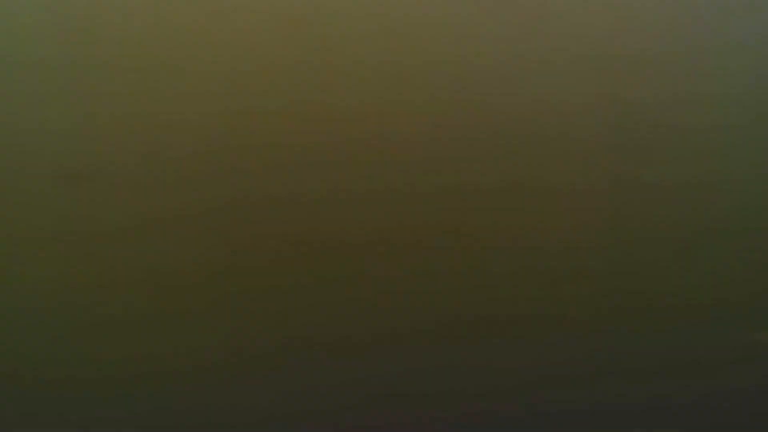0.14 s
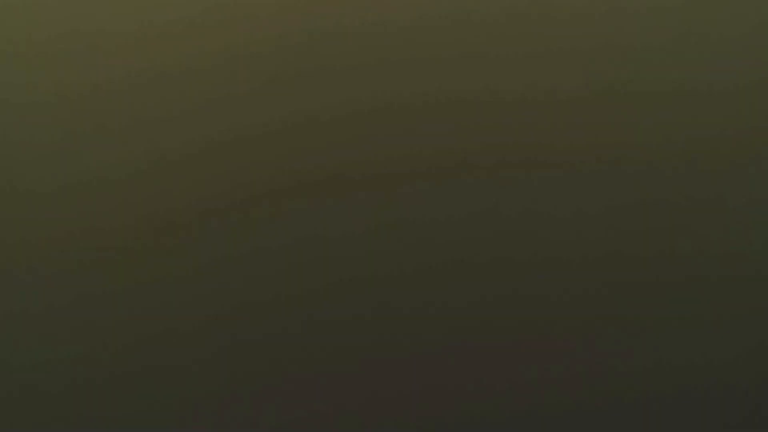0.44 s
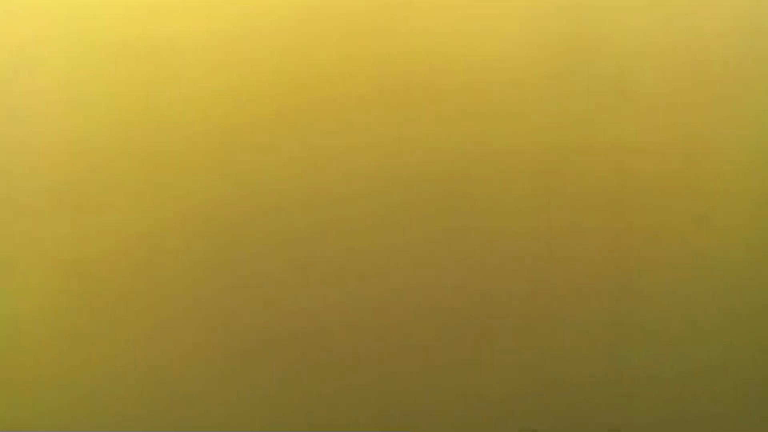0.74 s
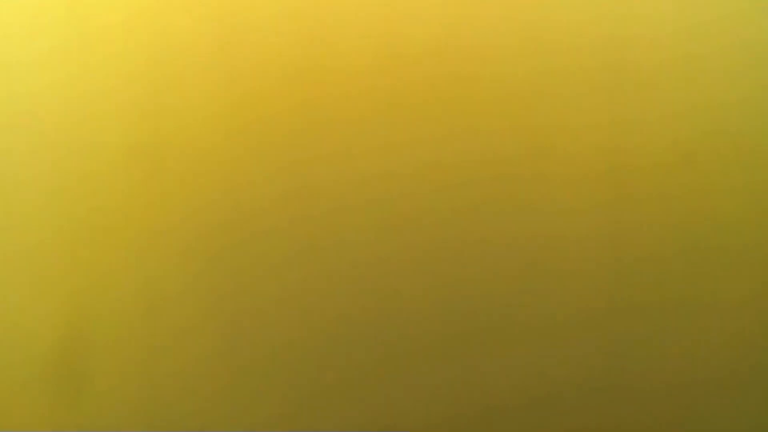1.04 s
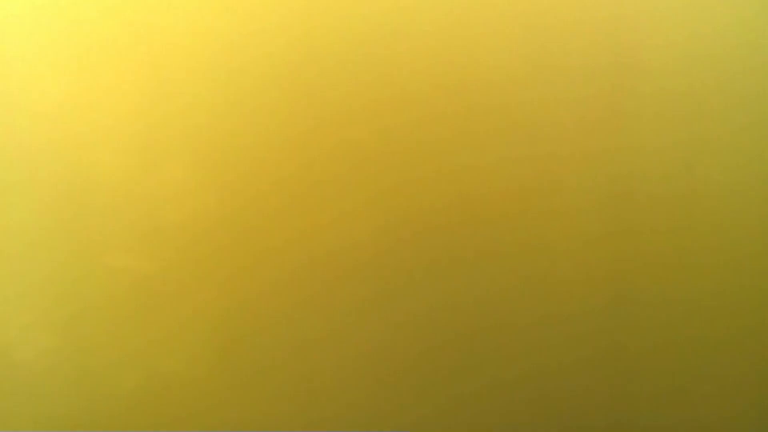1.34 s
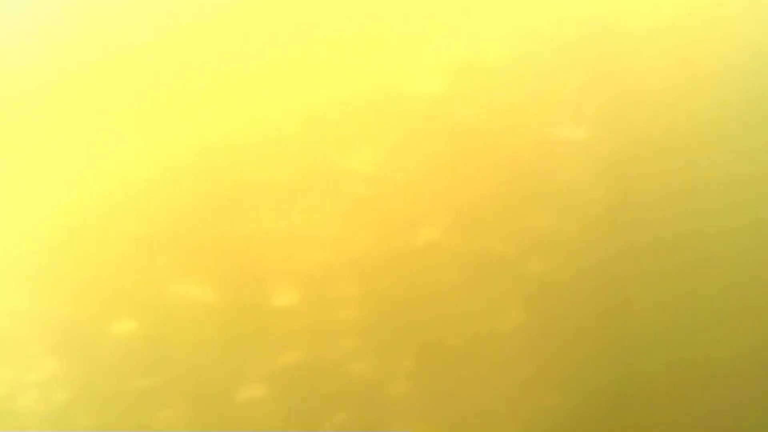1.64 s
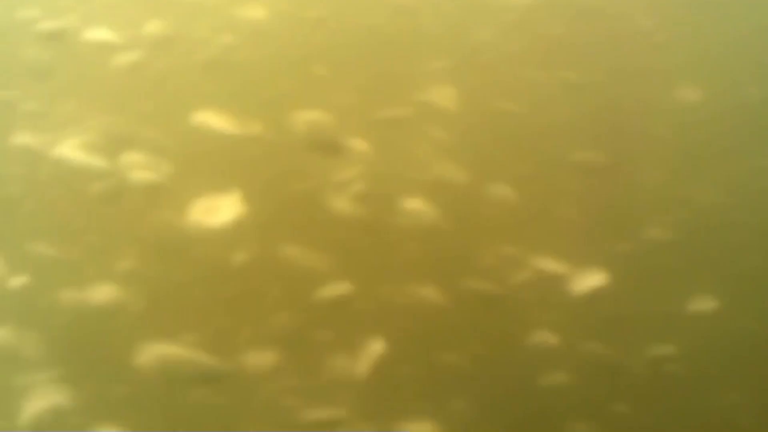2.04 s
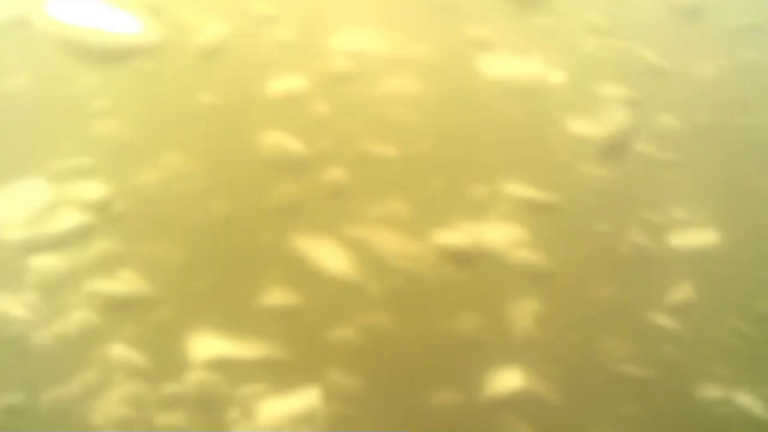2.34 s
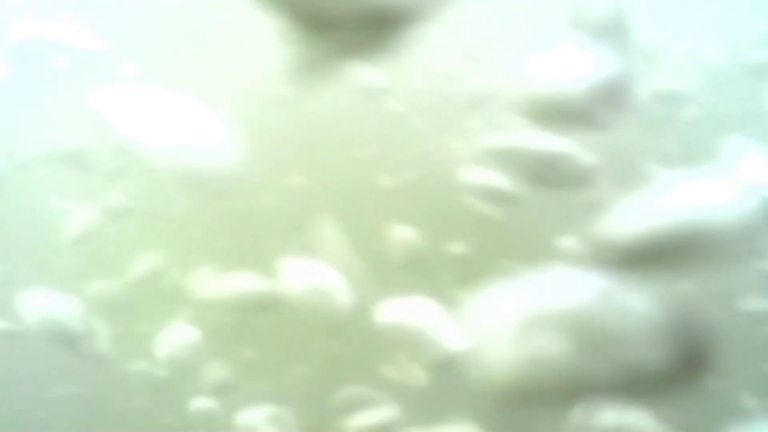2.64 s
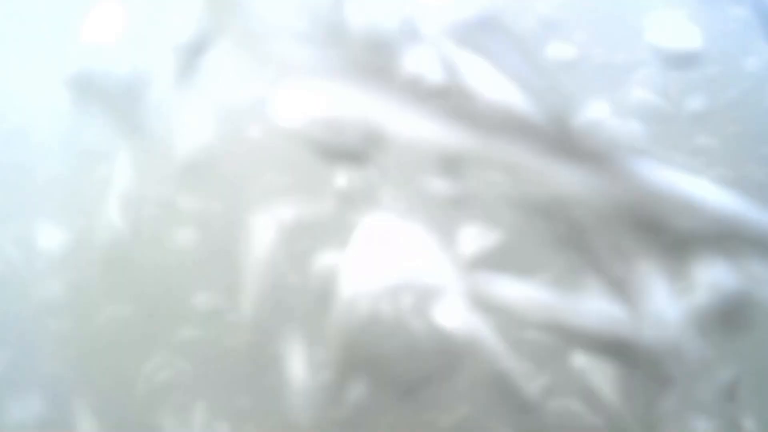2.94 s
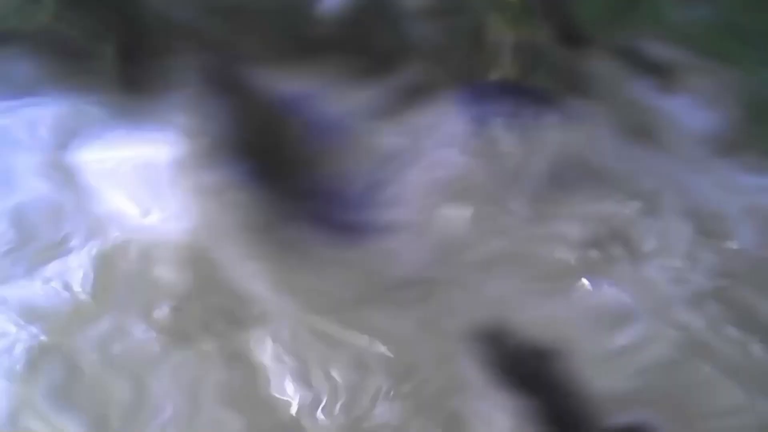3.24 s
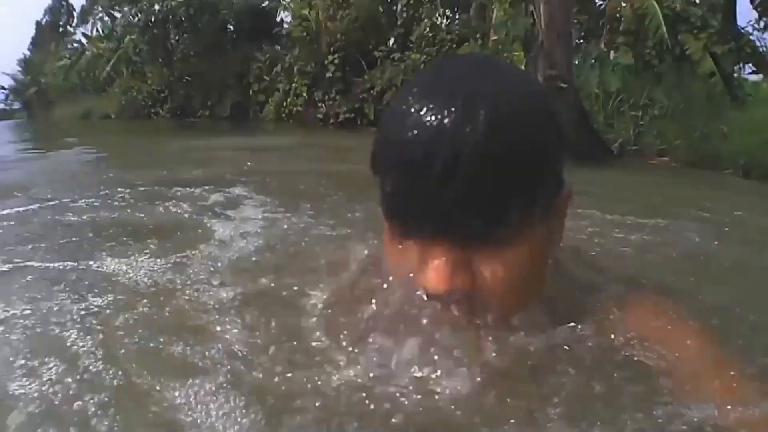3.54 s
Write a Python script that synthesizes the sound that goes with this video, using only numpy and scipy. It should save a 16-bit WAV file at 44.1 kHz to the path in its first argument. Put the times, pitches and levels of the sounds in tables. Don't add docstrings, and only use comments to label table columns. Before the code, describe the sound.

Water churns against a sealed camera beside a swimmer in an outdoor pond; an overloaded splash comes first, then quieter deep gurgling, then bright dripping, slapping spray as it surfaces, through a narrow, boxy microphone.

```python
import sys
import numpy as np
from scipy import signal
from scipy.io import wavfile

SR = 44100
rng = np.random.default_rng(int(sys.argv[2]) if len(sys.argv) > 2 else 0)


def waveform_to_disk(signal):
    frames = np.transpose(np.atleast_2d(signal))
    scaled = np.clip(frames, -1, 1) * 32767
    samples = np.round(scaled).astype(np.int16)
    wavfile.write(sys.argv[1], SR, samples)


N = 163170

# t/s, vigour level/dB, small-bubble muffling/dB, large-bubble weight/dB
CHURN_PATH = [(0, -40, -4, 15.5), (0.082, -48, 8.5, 3), (0.097, -14, 12.5, 13.5), (0.191, -35.5, 17.5, 2.5),
              (0.292, -10.5, -7.5, -16), (0.359, -5, -9.5, 4), (0.492, -5.5, -13, -16),
              (0.519, -12, -9.5, -8.5), (.64, -14, -19, -4), (0.951, -22.5, -26, 2.5),
              (1.8, -25.5, -28.5, 0.5), (2.6, -30, -27, -2.5), (2.88, -20.5, -33, -7),
              (3.081, -24, -23.5, -15.5), (3.3, -21, -21, -26), (3.482, -20.5, -11.5, -22),
              (3.6, -25.5, -10.5, -14), (3.65, -41, -6.5, -2)]
# f/Hz, level/dB
BUBBLE_SIZES = [
    (35, -31.5),
    (110, 1),
    (750, -0.5),
    (1080, -4),
    (1500, 7.5),
    (2150, 1.5),
    (2500, -11.5),
    (6000, -19),
]
# t/s, peak level/dB, f/Hz, t60/s
GLUGS = [(.405, 4.5, 252, 0.13), (.55, 0, 105, 0.082), (.685, -4.5, 332, 0.092), (.815, -11, 321.7, 0.2),
         (.815, -11.5, 183, .12), (1.437, -11.5, 343, 0.15), (1.74, -15, 517, 0.074),
         (1.903, -16.5, 168, 0.29), (1.94, -25, 84.7, 0.41), (2.168, -16.5, 303, 0.25),
         (2.17, -21.5, 88.8, 0.3), (2.242, -12.5, 300, 0.13), (2.245, -20, 174.9, 0.67),
         (2.275, -9, 242, 0.08), (2.28, -19, 90, 0.3), (2.295, -12.5, 350, 0.081),
         (2.421, -11.5, 188.6, 0.13), (2.637, -21, 110, 0.097), (2.66, -12.5, 263, 0.077),
         (2.856, -21.5, 484, 0.26), (3.076, -10.5, 574, 0.032), (.644, -11.5, 419, 0.093),
         (.745, -13, 476, 0.078), (.795, -7, 300, 0.073), (.876, -13, 504, 0.085), (.904, -19, 586, 0.087),
         (1.004, -12, 479, 0.037), (1.197, -21.5, 514, 0.083), (1.484, -16, 452, 0.09),
         (2.885, -12.5, 600, .05)]
# t/s, peak level/dB, f/Hz, t60/s
GULPS = [(0.0855, -5, 150, 0.018), (0.089, 15.5, 95.8, 0.068), (0.128, 12.5, 857, 0.019),
         (.155, 1.5, 585, 0.054), (0.157, 2.5, 43.4, 0.1), (0.226, 5.5, 848, 0.027), (.256, 2, 850, 0.026),
         (.095, 17, 279, 0.032), (0.336, 4, 71.6, 0.075), (.372, 8, 800, 0.021), (.428, 5, 767, 0.025),
         (3.138, -4, 602.3, 0.18), (3.272, -13.5, 788, 0.072), (3.497, 10.5, 980, 0.0078),
         (3.5, -12, 950, 0.071), (3.519, 7.5, 590, 0.011), (3.604, 5, 850, 0.011), (3.612, -7, 885, 0.024),
         (3.497, 10.5, 300, 0.0067), (0.461, -1, 129.3, 0.18), (.333, 13.5, 948, 0.014),
         (0.35, 4.5, 930, .02), (.533, -6, 794, 0.026), (3.402, -13, 800, .02), (3.427, -14.5, 806, 0.038),
         (3.531, -13, 850, 0.026), (3.545, -7, 850, 0.013), (3.553, -17, 810, 0.046),
         (3.592, -21, 880, 0.027), (3.678, -17, 1020, 0.028)]
# t/s, peak level/dB, f/Hz, life/s, starting drop/octaves
AIR_POCKETS = [
    (.3005, 18.5, 134, 0.067, 2.07),
    (.15, -15.5, 50, 0.24, 0.18),
    (3.138, -13, 172, 0.2, 0.12),
    (3.62, -32, 870, 0.109, 0.162),
]
# t/s, rms level/dB, length/s
SLAPS = [(.0, -31.5, 0.015), (0.0945, 4, 0.013), (0.126, -6, 0.0039), (0.148, -7, 0.0034),
         (0.196, -12, 0.003), (.2045, 4, 0.002), (0.2115, 1, 0.0018), (0.22, -10.5, 0.029),
         (.254, -17.5, 0.0073), (0.274, -19, 0.023), (0.347, -24, 0.004), (0.401, -17.5, 0.005),
         (0.4537, -15, 0.005), (0.473, -18.5, 0.0017), (0.491, -17, 0.0024), (3.501, -12, 0.00067)]
# t/s, peak level/dB, f/Hz, t60/s
DROPS = [(3.103, -12.5, 3190, 0.016), (3.143, -17, 1687, 0.024), (3.179, -16, 2180, 0.026),
         (3.177, -15, 4050, 0.0091), (3.208, -10.5, 1700, 0.02), (3.228, -16, 1894, 0.036),
         (3.215, -23, 2010, .015), (3.224, -26, 3500, 0.0094), (3.24, -7.5, 3760, 0.0064),
         (3.247, -16, 3760, 0.024), (3.252, -8.5, 1965, 0.032), (3.344, -14.5, 1790, 0.0083),
         (3.356, -17, 2310, 0.016), (3.3683, 4, 1930, 0.016), (3.372, -24.5, 4160, 0.011),
         (3.393, -8, 1950, 0.019), (3.394, -5, 2980, 0.0055), (3.406, -10, 2020, 0.025),
         (3.417, -33, 4350, 0.0067), (3.429, -26, 4740, 0.013), (3.463, -2.5, 2330, 0.0067),
         (3.469, 8, 3890, 0.0085), (3.479, -2, 2340, 0.015), (3.494, -21.5, 1816, 0.066),
         (3.492, -2, 3500, 0.0049), (3.512, -10.5, 6270, 0.0069), (3.558, -11.5, 3910, 0.015),
         (3.574, -22, 6430, 0.007), (3.604, 2.5, 1740, 0.012), (3.613, -1.5, 4000, 0.011),
         (3.62, -11, 2670, 0.011), (3.68, -15, 1490, 0.0083), (3.692, -15, 4300, 0.0074),
         (3.436, -20, 2300, 0.012), (3.447, -37, 3030, 0.013), (3.535, -16, 2350, 0.011),
         (3.553, -19.5, 2140, 0.022), (3.565, -16, 4170, 0.0058), (3.58, -19, 2020, 0.013),
         (3.598, -21, 1800, 0.0086), (3.605, -20, 3200, 0.013)]
# t/s, peak level/dB, f/Hz, t60/s
TICKS = [(0.065, -5.5, 1250, 0.011), (0.178, -3.5, 4000, 0.0097), (0.2666, -3, 3190, 0.0097),
         (0.197, -2, 3270, 0.012), (.2005, 4.5, 1950, .012), (0.2105, 4.5, 4520, 0.013),
         (0.168, -14, 5400, .01), (0.278, -5, 3980, 0.0077), (0.285, -15, 5100, 0.0088),
         (0.4914, 2, 1950, 0.011), (0.472, 1, 1890, 0.02), (.552, -30, 4000, .02),
         (.793, -24.5, 1600, 0.02), (0.859, -44, 3080, 0.031), (0.8894, -42.5, 3000, .025),
         (2.9509, -32, 1730, 0.014), (2.97, -36.5, 2340, 0.014), (3.008, -40, 2060, .02),
         (3.0346, -37.5, 1950, 0.016), (3.054, -43.5, 2080, 0.018), (0.413, -10, 4480, 0.0091),
         (0.447, -16, 4560, 0.0076), (.678, -24, 1620, 0.02), (0.717, -18.5, 2040, 0.015),
         (0.763, -22.5, 1540, 0.026), (.833, -32, 3890, 0.016), (0.905, -24, 1374, 0.032)]
# f/Hz, level/dB, t60/s
SHELL_MODES = [
    (850, 1, 0.033),
    (1950, 19, 0.0068),
    (2960, 8, 0.015),
    (4300, -7, 0.028),
]
# f/Hz, level/dB, t60/s
FIZZ_MODES = [
    (1950, 5, 0.002),
    (3140, -2.5, 0.0053),
    (4010, -2, 0.0036),
]


def from_db(db):
    return 10 ** (np.asarray(db) / 20)


def rms_one(x):
    return x / np.sqrt(np.mean(x ** 2) + 1e-20)


def butter(x, hz, kind, order=2):
    return signal.sosfilt(signal.butter(order, hz, kind, fs=SR, output="sos"), x)


def ring(clicks, hz, t60):
    radius = from_db(-60 / (t60 * SR))
    turn = 2 * np.pi * hz / SR
    return signal.lfilter([0, np.sin(turn)], [1, -2 * radius * np.cos(turn), radius ** 2], clicks + 1e-18)


def drift(rate_hz):
    hop = 40
    r = np.exp(-2 * np.pi * hop * rate_hz / SR)
    slow = signal.lfilter([1], [1, -2 * r, r * r], rng.standard_normal(N // hop + 2002))[2000:]
    return np.interp(np.arange(N) / hop, np.arange(len(slow)), rms_one(slow))


def random_sizes(spread_db):
    return from_db(spread_db * np.minimum(rng.exponential(1, N), 4)) * rng.standard_normal(N)


def churn_curves():
    s, *columns = np.transpose(CHURN_PATH)
    return [np.interp(np.arange(N) / SR, s, column) for column in columns]


def churn():
    grains_per_s, grain_cycles, grain_spread_db = 100, 17, 0.6
    clump_db, clumps_per_s, spray_clump_db, spray_clumps_per_s = 0.5, 5.7, 1.5, 60.0
    deep_edge_hz, top_edge_hz, edge_octaves_per_db = 800, 1080, 0.03
    blend_octaves, muffle_tilt, large_below_hz = 0.05, 0.2, 406
    vigour, muffle, weight = churn_curves()
    together = drift(clumps_per_s)
    spray = spray_clump_db * drift(spray_clumps_per_s) * from_db(np.minimum(muffle, 0) * 0.3)
    edge = np.log2(deep_edge_hz) + edge_octaves_per_db * np.clip(-weight, 0, None)
    edge = np.minimum(edge, np.log2(top_edge_hz))
    sizes_hz, sizes_db = np.transpose(BUBBLE_SIZES)
    out = 0
    for hz in np.geomspace(30, 6600, num=36):
        born = rng.random(N) < grains_per_s * (hz / 300) ** 0.8 / SR
        grains = born * random_sizes(grain_spread_db)
        rings = rms_one(ring(ring(grains, hz, grain_cycles / hz), hz, 5.0 / hz))
        small = (1 + np.tanh((np.log2(hz) - edge) / (2 * blend_octaves))) / 2
        small = small * (1 + muffle_tilt * np.log2(hz / 1500))
        large = max(0, np.log2(large_below_hz / hz)) * 0.8
        size_db = np.interp(np.log(hz), np.log(sizes_hz), sizes_db)
        clump = clump_db * (1.4 * together + drift(clumps_per_s))
        level_db = vigour - 9 + size_db + small * (muffle + spray) + large * weight + clump
        out = out + from_db(level_db) * butter(rings, hz * 0.83, "low")
    return out


def bubbles(rows, rise, rough, swell_cycles, shape=1):
    slide_s = 0.005
    out, t = np.zeros(N + SR), np.arange(SR // 2) / SR
    for s, db, hz, t60, *slide in rows:
        octaves = rise * (t / t60 - 0.15) - sum(slide) * np.exp(-t / slide_s)
        phase = 2 * np.pi * np.cumsum(hz * 2 ** np.minimum(octaves, 1)) / SR
        one, two = rms_one(butter(rng.standard_normal((2, len(t))), hz / 6.16, "low"))
        wave = (1 + rough * one) * np.sin(phase) + rough * two * np.cos(phase)
        swell = 1 - np.exp(-t * hz / swell_cycles)
        i = int(s * SR)
        out[i:i + len(t)] += from_db(db - 60 * (t / t60) ** shape) * swell * wave
    return out[:N]


def air_cavities():
    loose = bubbles([*GLUGS, *GULPS], rise=0.32, rough=0.3, swell_cycles=0.85)
    return loose - bubbles(AIR_POCKETS, rise=0.04, rough=0.18, swell_cycles=0.68, shape=2.65)


def shell(x):
    return sum(from_db(db) * ring(x, hz, t60) for hz, db, t60 in SHELL_MODES)


def slaps():
    tail_t60_s, shell_db = 0.015, -1.5
    t, gain = np.arange(N) / SR, np.zeros(N)
    for s, db, length in SLAPS:
        gain += (t >= s) * from_db(db - 60 * np.clip(t - s - length, 0, None) / tail_t60_s)
    white = rng.standard_normal(N)
    direct = rms_one(butter(white, [300, 3500], "band", order=1))
    return gain * (direct + from_db(shell_db) * rms_one(shell(white))) * 0.49


def knocks():
    knock_db = -29.5
    rows = np.array([*DROPS, *TICKS])
    chance = rng.standard_normal((len(rows), len(SHELL_MODES)))
    out = 0
    for (hz, db, t60), luck in zip(SHELL_MODES, chance.T):
        clicks = np.zeros(N)
        clicks[(rows[:, 0] * SR).astype(int)] = from_db(rows[:, 1] + db + knock_db) * luck
        soft = ring(clicks, hz, 4 / hz)
        out = out + ring(soft, hz, t60) / 3
    return out


def cracks():
    crack_db, crack_t60_s = -22, 0.0026
    out, t = np.zeros(N + SR), np.arange(SR // 20) / SR
    for s, db, hz, _ in [*DROPS, *TICKS]:
        noise = rms_one(butter(rng.standard_normal(len(t)), [hz / 2, hz * 1.5], "band"))
        i = int(s * SR)
        out[i:i + len(t)] += from_db(db + crack_db - 60 * t / crack_t60_s) * noise
    return out[:N]


def drops():
    ringing = bubbles([*DROPS, *TICKS], rise=0.061, rough=0.4, swell_cycles=4.0, shape=1.4)
    return ringing + knocks() + cracks()


def fizz():
    fizz_db, fizz_per_s, clump_db, clumps_per_s, muffle_share = -18, 900, 3, 25.0, 0.9
    vigour, muffle, _ = churn_curves()
    out = 0
    for hz, db, t60 in FIZZ_MODES:
        ticks = random_sizes(2.5) * (rng.random(N) < fizz_per_s / SR)
        sung = rms_one(ring(ring(ticks, hz, t60), hz, t60 / 2))
        out = out + from_db(db + clump_db * drift(clumps_per_s)) * sung
    return from_db(fizz_db + vigour + muffle_share * muffle) * out


def patter():
    patter_db, patter_per_s, surfaces_s = 10.5, 510, 3.05
    vigour, muffle, _ = churn_curves()
    hits = random_sizes(2.2) * (rng.random(N) < patter_per_s / SR)
    ticks = butter(hits, [800, 2600], "band", order=3)
    heard = rms_one(shell(ticks)) + 1.6 * rms_one(ticks)
    surfaced = np.arange(N) / SR > surfaces_s
    return surfaced * from_db(patter_db + vigour + 1.7 * muffle) * heard * 0.5


def hiss():
    hiss_db, open_air_db, plunges_s = -55.5, 22.5, 0.09
    in_air = np.arange(N) / SR < plunges_s
    noise = rms_one(butter(rng.standard_normal(N), 1420, "high", order=1))
    return from_db(hiss_db + open_air_db * in_air) * noise


def scene():
    water = butter(churn(), 45, "high") + air_cavities()
    housing = slaps() + drops() + fizz() + patter()
    return (water + housing + hiss())[None]


def top_cut(x):
    return signal.sosfilt(signal.butter(12, 16340, fs=SR, output="sos"), x)


def record(dry):
    overload, sag_hz, faint_db = 0.86, 5.0, -75.5
    narrow = signal.sosfilt(signal.ellip(8, 0.5, 70, 6630, fs=SR, output="sos"), dry)
    clipped = np.clip(narrow, -overload, overload)
    sagged = butter(clipped, sag_hz, "high", order=1)
    hissy = sagged + from_db(faint_db) * rng.standard_normal(dry.shape)
    mix = signal.sosfilt(signal.cheby2(12, 70, 16100, fs=SR, output="sos"), hissy)
    return top_cut(mix)


dry = scene()
out = record(dry)
waveform_to_disk(out)
```